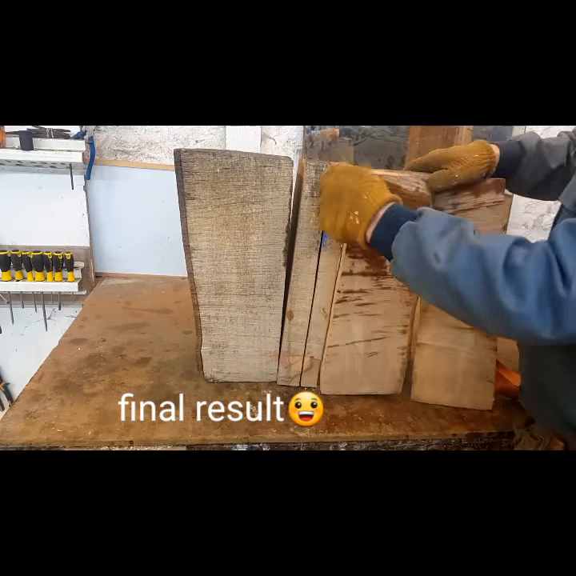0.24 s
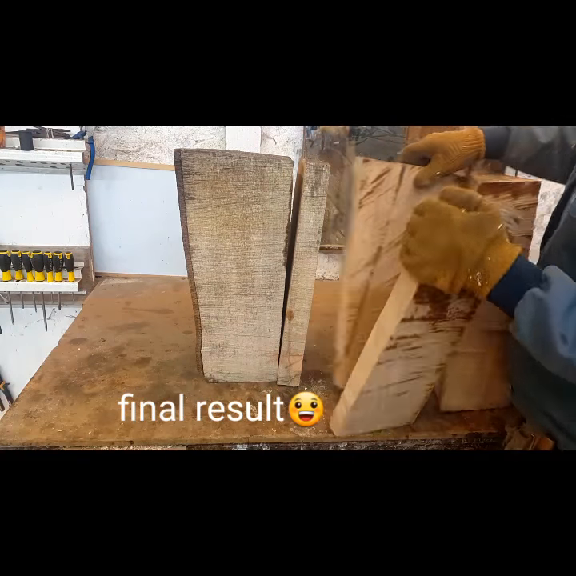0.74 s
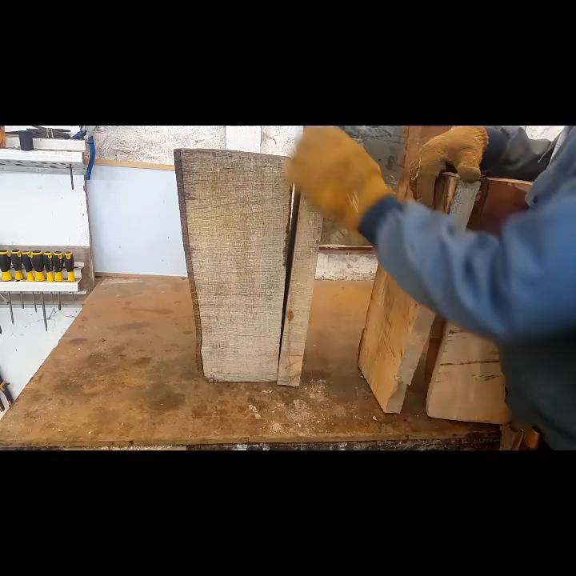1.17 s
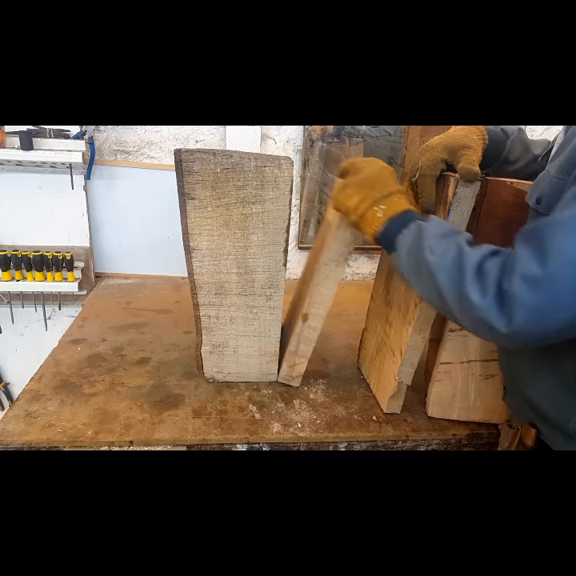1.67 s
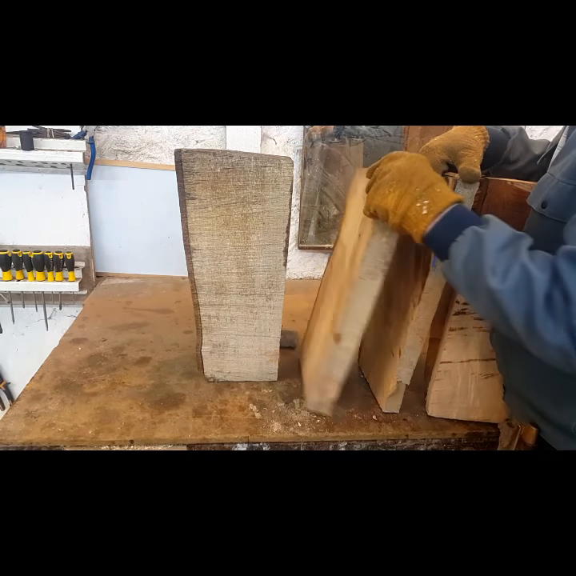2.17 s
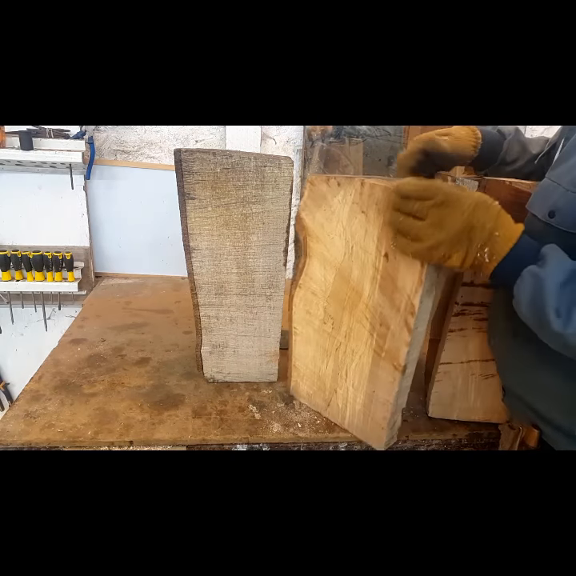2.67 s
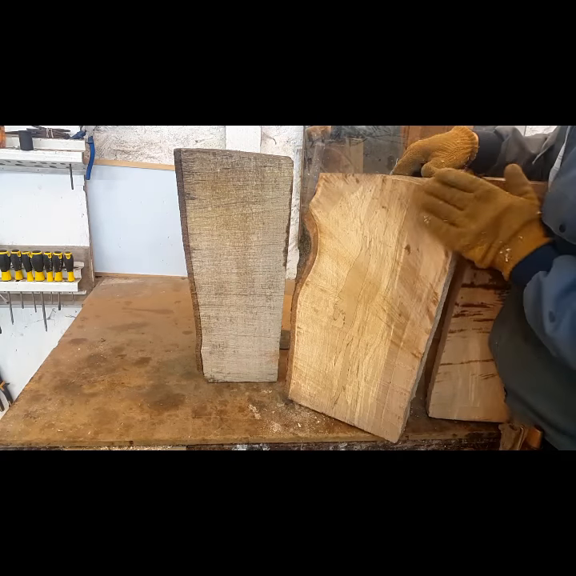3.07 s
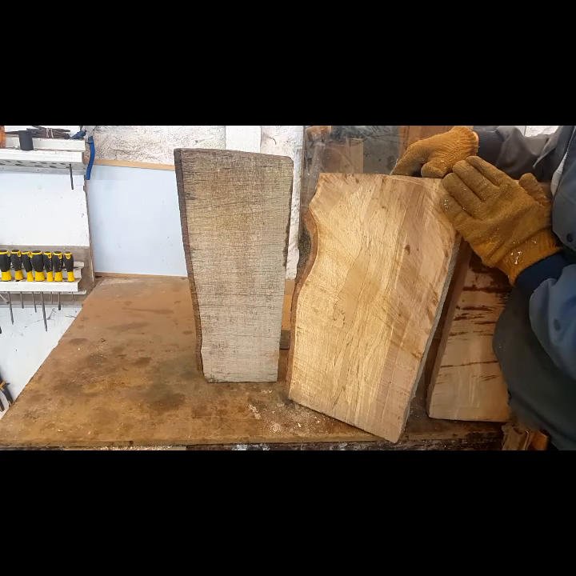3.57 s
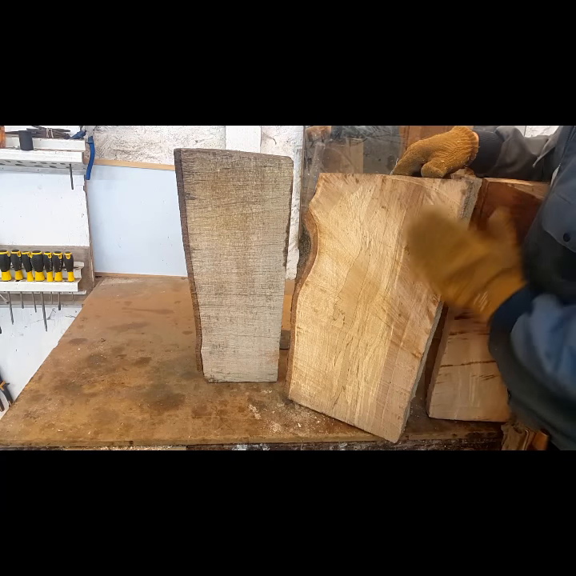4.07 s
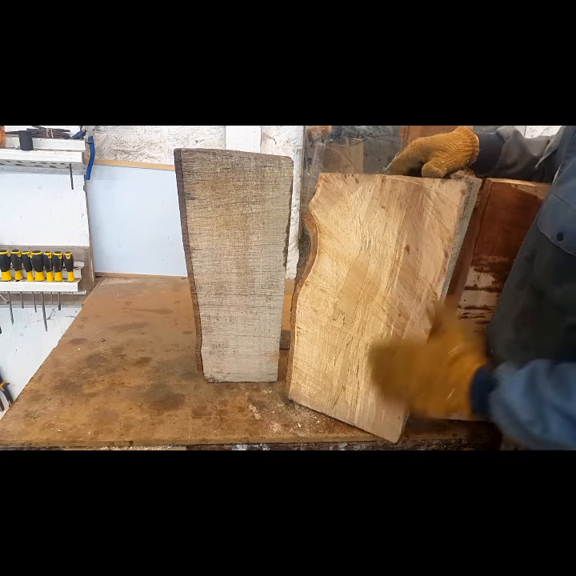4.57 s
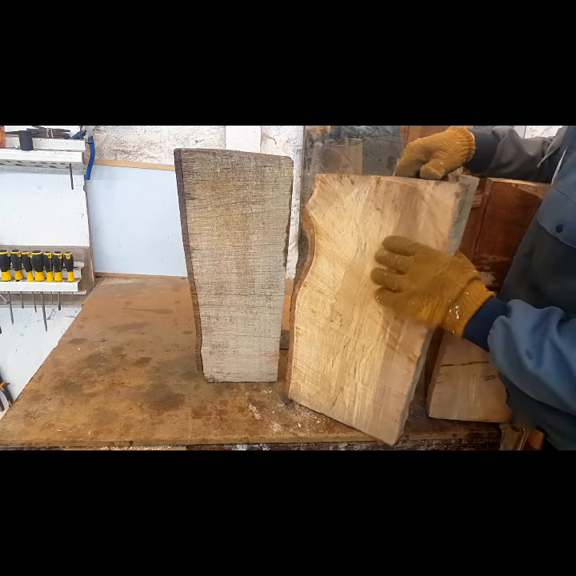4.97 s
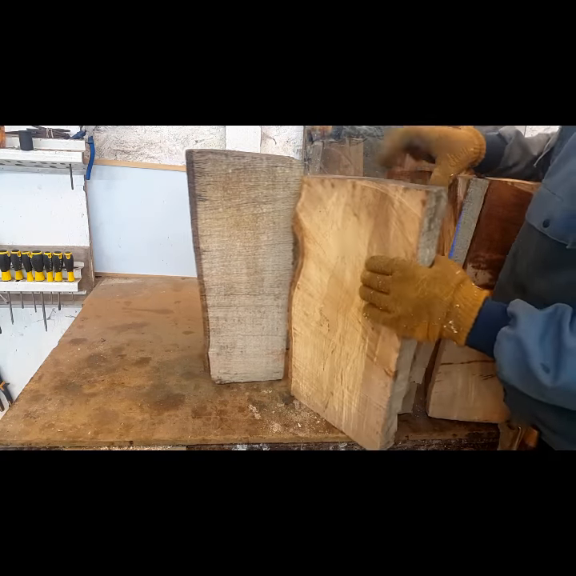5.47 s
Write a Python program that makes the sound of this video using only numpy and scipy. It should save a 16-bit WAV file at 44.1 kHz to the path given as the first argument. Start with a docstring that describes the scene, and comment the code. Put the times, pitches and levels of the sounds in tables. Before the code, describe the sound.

Wooden boards knock and scrape against each other and a workbench, with gloves rubbing over the rough wood.

```python
"""A small workshop, where gloved hands turn over sawn boards an arm's length from two microphones.
Boards knock on each other and on the bench, ringing in their damped bending modes; hard edges tick.
Stick-slip friction makes gloves hiss on the rough faces and dragged edges scrape, grumble and squeak.
The room reverberates briefly over microphone hiss and a faint hum; the level dips three times early on."""
import sys
import numpy as np
from scipy import signal
from scipy.fft import rfft, irfft
from scipy.io import wavfile
from scipy.ndimage import uniform_filter1d, map_coordinates

SR = 44100
rng = np.random.default_rng(int(sys.argv[2]) if len(sys.argv) > 2 else 0)


def dump(signal):
    """Clip the signal to [-1, 1] and save it as 16-bit WAV at the path in sys.argv[1]."""
    limited = np.clip(np.atleast_2d(signal).T, -1, 1)
    pcm = np.round(limited * 32767).astype(np.int16)
    wavfile.write(sys.argv[1], SR, pcm)


N = 252252

# Blows on the boards. Each row: start in seconds, level in dB, main mode in Hz, nominal cycles to fade
# 60 dB, rattle in dB, boost of the upper modes in dB, bass cutoff as a share of the main mode.
KNOCKS = [(0.004, -39.5, 212, 10.5, -12, 7, 0.81), (0.086, -46.5, 221, 15, -4, -3, 0.21),
          (0.128, -32.5, 335, 10, -18, -3, .4), (0.158, -48.5, 204, 17, 2, -8, 0.26),
          (0.182, -42, 237, 18, -19, -9, 0.37), (0.232, -56.5, 172, 15, 6, 7, 0.38),
          (0.456, -51, 432, 15, 13, -11, 0.38), (0.535, -43, 416, 15, -3, 6, .28),
          (0.555, -50.5, 156, 15, -8, -8, 0.24), (0.611, -41, 478, 24, 2, -4, .3),
          (0.64, -23, 476, 31, -5.5, -23, 0.15), (0.654, -28, 475, 15, -3, -6, 0.2),
          (0.708, -43, 300, 12, -19, -7, .35), (0.764, -31.5, 486, 23, -10, -3, .1),
          (0.801, -43.5, 366, 12, -6, -5, 0.32), (0.847, -33, 269, 11, -6.5, 2.5, 0.29),
          (0.91, -44, 198, 3, -1.5, -2, 0.24), (0.999, -14, 292, 7, -7.5, 3, 0.6),
          (1.045, -55, 296, 13, -14, -13, .4), (1.216, -26.5, 421, 30, 1.5, 4.5, 0.082),
          (1.448, -50, 665, 18, -3, 8, 0.35), (1.51, -53, 142, 19, -5, 2, 0.38),
          (1.699, -37.5, 890, 47, -17, 8, 0.62), (1.76, -24, 518, 21, -11.5, 10, 0.56),
          (1.81, -21.5, 398, 31.5, -10, 4, 0.75), (1.847, -7, 1246, 25.5, 2.5, 7, 0.87),
          (1.855, -18.5, 682, 22, 7.5, 18, 0.54), (1.863, -25.5, 858, 7, 9.5, -1.5, 0.35),
          (1.889, -25.5, 896, 27, 0.5, -1, .32), (1.983, -22, 243, 15.5, 0, 4.5, 0.37),
          (1.994, -21.5, 304, 10.5, -10, 9.5, 0.65), (2.285, -23.5, 480, 19, -19, -8, 0.39),
          (2.298, -18.5, 1030, 16, 1, -9, 0.61), (2.36, -21, 923, 38, -2, 13, 0.22),
          (2.43, -32.5, 700, 27, 4, 4, .3), (2.86, -47.5, 492, 21, 8, -7, 0.39),
          (3.003, -48, 460, 27, 6, -3, 0.86), (3.038, -18.5, 294, 29.5, -12, 4.5, 0.41),
          (3.047, -23, 700, 26, -14, -1, 0.57), (3.054, -24, 336, 16, -11, 2, 0.32),
          (3.129, -36, 328, 42, -24, 4, 0.42), (3.176, -42, 294, 24, -17.5, -1, 0.39),
          (5.128, -38.5, 460, 45, -3, -3.5, 0.25), (5.421, -35, 325, 30, -22, 2.5, 0.45),
          (5.445, -34.5, 188.5, 15, -4.5, 3, 0.55), (5.461, -32.5, 336, 19, -17, 5, 0.41),
          (5.496, -41.5, 238, 25, -11, -2, 0.23), (5.515, -45.5, 239, 32, -12, -5, 0.3)]
# Modes of a board. Each row: ratio to the main mode, level in dB, share of the nominal ring time.
BOARD_MODES = [(.6, -11, 0.8), (0.858, -7, 1.02), (1.002, -1.5, 1.09), (1.198, -9, .9), (1.5, -12, 0.86),
               (2.1, -2, 0.39), (2.799, -14, 0.39), (3.899, -12.5, .5), (5.3, -15.5, .4)]
# Hard edges and grit ticking. Each row: start in seconds, peak in dB.
TICKS = [(0.046, -45), (0.099, -52), (0.232, -49), (0.5345, -42), (0.6452, -29), (0.849, -40),
         (1.0006, -28.5), (1.2198, -35), (1.492, -40.5), (1.6493, -37.5), (1.7611, -35), (1.8128, -29),
         (1.8474, -29), (1.8539, -36), (1.892, -47), (1.9844, -14.5), (2.126, -27), (2.1283, -16.5),
         (2.1415, -35), (2.301, -18), (2.8883, -53), (3.041, -33), (5.016, -38.5), (5.4497, -37)]
# Strokes of a glove or board edge. Each row: time of the peak, rise and fall in seconds,
# then the levels of fibre hiss, board grumble and scrape in dB.
STROKES = [(0.1, 0.034, 0.0062, -51.5, -74, -62), (0.176, 0.074, 0.096, -67, -62, -67),
           (0.263, 0.039, 0.034, -60, -64, -63), (0.41, 0.072, 0.085, -64, -65, -64),
           (0.52, 0.25, 0.062, -59, -66.5, -65.5), (0.625, 0.055, 0.091, -52.5, -50.5, -52),
           (0.79, 0.13, 0.038, -60, -83, -59), (0.915, 0.11, 0.02, -57.5, -70, -63),
           (1.02, 0.037, 0.046, -79, -79, -80), (1.12, 0.12, 0.067, -58, -99, -86),
           (1.232, 0.019, 0.01, -40.5, -42.5, -59), (1.37, 0.13, 0.8, -65, -88, -81),
           (1.48, 0.099, 0.28, -71.5, -68, -73), (1.684, 0.073, 0.21, -56.5, -61, -57.5),
           (1.859, .03, 0.32, -52, -53.5, -40.5), (2.009, .08, 0.13, -51, -41.5, -70),
           (2.251, .15, 0.082, -43, -45.5, -47.5), (2.309, 0.11, 0.17, -38.5, -41, -50.5),
           (2.42, 0.17, 0.12, -53.5, -43.5, -45), (2.508, 0.13, 0.11, -43, -44, -46.5),
           (2.63, 0.13, 0.12, -58, -54, -63.5), (2.867, 0.39, 0.21, -56, -60.5, -61),
           (3.061, 0.058, 0.23, -55.5, -44.5, -53), (3.349, 0.3, 0.14, -53.5, -67, -63),
           (4.27, .15, .2, -47.5, -64.5, -57.5), (4.451, 0.33, 0.22, -40, -58.5, -54),
           (4.72, .17, 0.18, -48.5, -59.5, -61.5), (5.05, 0.53, 0.22, -63, -69, -72),
           (5.179, .1, 0.21, -52, -51.5, -54), (5.46, 0.093, 0.17, -62, -53, -65),
           (5.661, 0.063, 0.086, -36, -56, -49.5), (5.715, 0.062, .1, -22, -41, -33)]
# Wood chirping as an edge slips. Each row: start in seconds, pitch in Hz, level in dB, rise in ms.
SQUEAKS = [(0.458, 1520, -48.5, 2.2), (1.65, 7100, -56.5, 18), (1.762, 4400, -44.5, 3),
           (1.813, 4500, -50, 3), (1.948, 6200, -43, 3.2), (5.14, 1820, -51.5, 10)]

# Noise spectra. Each row: frequency in Hz, level in dB before colour() scales it by its contrast.
RATTLE_SPECTRUM = [(80, -40), (200, -2), (500, 6.5), (1200, 5), (2500, -3.5), (4200, -11), (5600, 0),
                   (9000, -25), (15500, -61)]
TICK_SPECTRUM = [(400, -24), (1200, -5), (2500, -3), (4200, -4), (5600, 0), (8000, -6), (12000, -15),
                 (16000, -24)]
FIBRE_SPECTRUM = [(880, -32.5), (1500, -16.5), (1810, -19.5), (1960, -19), (2360, -14), (2660, -11.5),
                  (4430, -7), (5510, 4.5), (9280, -19.5), (12200, -25.5), (13800, -40), (15300, -36.5),
                  (15800, -51)]
GRUMBLE_SPECTRUM = [(24, -97), (40, -49), (150, -11), (206, -13), (287, -6), (446, -3.5), (496, -8),
                    (568, -6), (661, -6.5), (1500, -26.5), (1950, -48), (3300, -120)]
SCRAPE_SPECTRUM = [(400, -16), (800, 0.5), (1200, -0.5), (2000, -4), (3200, -9), (5000, -36.5)]
HISS_SPECTRUM = [(15, -38), (25, 8), (36, -20), (107, -7), (137, -11), (587, -5.5), (729, -11), (2090, -16),
                 (3880, -15), (4570, -16.5), (4950, -9.5), (7030, -9.5), (8050, -20.5), (12100, -20),
                 (15800, -25)]

# Reverberation. Each row: band centre in Hz, time to fade 60 dB in seconds, level in dB.
ROOM_BANDS = [(123, 0.9, -11.5), (293, 0.16, -9.5), (700, 0.19, -9.5), (1510, 0.24, -9), (3050, 0.12, -11),
              (6000, 0.12, -15), (12000, 0.19, -16.5)]
# Direction of the hands. Each row: time in seconds, lag of the left microphone in ms.
LEFT_LAG = [(.75, 0.043), (1.25, 0.21), (1.75, -0.06), (2.25, 0.043), (3.25, 0.091), (3.75, 0.15),
            (4.75, 0.13), (5.6, -0.075)]
# Unequal response of the two microphone ports. Each row: frequency in Hz, left minus right in dB.
PORT_BALANCE = [(60, -1), (110, -1), (200, -1), (380, -1), (700, -1.5), (1290, -0.5), (2380, 0),
                (4400, -4.5), (8120, 6), (15000, 6)]
# Dips of the whole level. Each row: start in seconds, end in seconds, gain in dB.
DIPS = [(0, .995, -3), (1.09, 1.215, -5), (1.275, 1.345, -15)]

CONTACT_MS, TICK_DECAY_MS = 0.86, 0.56
STACK_PAN_DB, KNOCK_SCATTER_DB, TICK_SCATTER_DB = 1.3, 2.5, 6.5  # left minus right: mean and spreads
STROKE_DROP_DB, STROKE_ROUNDNESS = 20, 1.32  # drop over one rise or fall; roundness 1 is a pointed top
FIBRE_WIDTH = .65  # side over mid: each microphone hears its own part of the glove
WALL_MS, WALL_DB, COHERENT_BELOW_HZ = 6.1, -19, 651
HISS_DB, HUM_DB, HUM_BAND_HZ = -65.5, -87, (89, 111)
CONTACT_DELAY_MS = 1.6  # knocks, ticks and squeaks sound this long after their listed times
LOW_CUT_HZ, TOP_CUT_HZ, DC_OFFSET, DIP_RAMP_S = 42.8, 15900, -.0004, .012
SIDES = np.array([[1], [-1]])  # opposite signs for left and right


def board_knocks():
    """Modal vibration: a half-sine contact force excites a board's damped modes, with a short rattle."""
    t = np.arange(SR // 3) / SR
    ratio, mode_db, ring_share = np.transpose(BOARD_MODES)[:, :, None]
    scatter = rng.standard_normal((len(KNOCKS), 2, len(BOARD_MODES), 1))
    noises = rng.standard_normal((len(KNOCKS), len(t)))
    pans_db = STACK_PAN_DB + KNOCK_SCATTER_DB * rng.standard_normal(len(KNOCKS))
    force = np.sin(np.pi * np.clip(t[:400] * 1000 / CONTACT_MS, 0, 1))
    out = np.zeros((2, N + len(t)))
    for knock, (detune, spot), noise, pan_db in zip(KNOCKS, scatter, noises, pans_db):
        start, db, hz, cycles, rattle_db, upper_db, cutoff_share = knock
        log_decay = -np.log(1000) * t * hz / cycles
        # the spot that is hit sets how strongly each mode answers
        strength = undb(mode_db + upper_db * (ratio > 4 / 3) + 0.49 * spot)
        mode_hz = hz * ratio * (1 + 0.016 * detune)
        modes = strength * np.exp(log_decay / ring_share) * np.sin(2 * np.pi * mode_hz * t)
        ring = np.convolve(modes.sum(axis=0), force)[:len(t)]
        ring *= 1 - np.exp(-t * hz / .6)  # builds as the board rocks into full contact
        rattle = undb(rattle_db) * colour(noise * np.exp(log_decay / 0.84), RATTLE_SPECTRUM)
        # a free board radiates little below its lowest mode, one resting on the bench more
        blow = butterworth(ring / np.abs(ring).max() + rattle, 3, cutoff_share * hz, "highpass")
        out[:, int(start * SR):][:, :len(t)] += undb(db + SIDES * pan_db / 2) * blow
    return out[:, :N]


def edge_ticks():
    """A brief contact has a broad spectrum: each tick is an impulse and a fast-dying burst of noise."""
    t = np.arange(SR // 50) / SR
    noises = rng.standard_normal((len(TICKS), len(t)))
    pans_db = TICK_SCATTER_DB * rng.standard_normal(len(TICKS))
    out = np.zeros((2, N + len(t)))
    for (start, db), noise, pan_db in zip(TICKS, noises, pans_db):
        burst = (noise + 5 * (t == 0)) * np.exp(-t * 1000 / TICK_DECAY_MS)
        tick = colour(burst, TICK_SPECTRUM)
        tick /= np.abs(tick).max()
        out[:, int(start * SR):][:, :len(t)] += undb(db + SIDES * pan_db / 2) * tick
    return out[:, :N]


def rubbing():
    """Sliding friction: gloves hiss on the saw marks; dragged edges slip unevenly and shake the board."""
    hiss_gain, grumble_gain, scrape_gain = stroke_envelopes()
    slip = wander(49)
    mid, side = (friction_noise(12000, 1.8, FIBRE_SPECTRUM) for _ in range(2))
    hiss = (mid + FIBRE_WIDTH * side * SIDES) * hiss_gain * undb(.7 * wander(70) + .4 * slip)
    grumble = friction_noise(2500, 1.5, GRUMBLE_SPECTRUM) * grumble_gain * undb(1.5 * slip)
    scrape = friction_noise(5000, 2.2, SCRAPE_SPECTRUM) * scrape_gain * undb(1.2 * slip)
    return hiss + grumble + scrape


def stroke_envelopes():
    """Incoherent sources add in power: overlapping strokes give the gains of hiss, grumble and scrape."""
    t = np.arange(0, N + 32, 32) / SR
    power = 0
    for peak_s, rise_s, fall_s, *levels_db in STROKES:
        from_peak = np.where(t < peak_s, (peak_s - t) / rise_s, (t - peak_s) / fall_s)
        drop_db = STROKE_DROP_DB * from_peak ** STROKE_ROUNDNESS
        power += undb(np.array(levels_db)[:, None] - drop_db) ** 2
    return [np.interp(np.arange(N) / SR, t, np.sqrt(layer)) for layer in power]


def friction_noise(per_second, spread_db, spectrum):
    """Shot noise: fibres catch and let go in dense, random clicks of uneven size."""
    caught = rng.random(N) < per_second / SR
    clicks = caught * rng.standard_normal(N)
    sizes = undb(spread_db * np.minimum(rng.exponential(size=N), 4))
    return unit_rms(colour(clicks * sizes, spectrum))


def squeaks():
    """Stick-slip oscillation: short notes whose pitch and strength waver as an edge slips."""
    t = np.arange(N) / SR
    waver = 1 + .025 * wander(300)
    flutter = undb(4 * wander(250))
    out = np.zeros(N)
    for start, hz, db, rise_ms in SQUEAKS:
        age = np.clip(t - start, 0, None) * 1000 / rise_ms
        phase = 2 * np.pi * np.cumsum(hz * waver) / SR
        out += undb(db) * age * np.exp(1 - age) * np.sin(phase)
    return out * flutter


def reverberation(x):
    """Reflections depend on position: the hands move, so each tenth of a second has a new response."""
    hop = SR // 10
    window = np.sin(np.pi * np.arange(2 * hop) / (2 * hop))
    x = np.pad(x, (hop, 2 * hop))
    wet = np.zeros((2, N + SR))
    for at in range(0, N + hop, hop):
        part = signal.fftconvolve((x[at:at + 2 * hop] * window)[None], room_response(), axes=1)
        wet[:, at:at + part.shape[1]] += part
    return wet[:, hop:hop + N]


def room_response():
    """One wall echo and a diffuse field that decays by band; long waves reach both microphones alike."""
    t = np.arange(SR // 3) / SR
    out = np.zeros((2, len(t)))
    for hz, t60, db in ROOM_BANDS:
        mid, side = butterworth(rng.standard_normal((2, len(t))), 2, [hz / 1.5, hz * 1.5], "bandpass")
        width = min((hz / COHERENT_BELOW_HZ) ** 1.5, 1.3)
        envelope = (1 - np.exp(-(t / .005) ** 2)) * np.exp(-np.log(1000) * t / t60)
        out += undb(db) * (mid + width * side * SIDES) * envelope / np.linalg.norm(envelope)
    out[:, int(WALL_MS * SR / 1000)] += undb(WALL_DB)
    return out


def hiss_and_hum():
    """Self-noise is independent in each microphone; a wavering narrow-band hum is common to both."""
    hiss = np.array([unit_rms(colour(rng.standard_normal(N), HISS_SPECTRUM)) for _ in range(2)])
    hum = butterworth(rng.standard_normal(N), 2, HUM_BAND_HZ, "bandpass")
    return undb(HISS_DB + .5 * wander(5)) * hiss + undb(HUM_DB) * unit_rms(hum)


def colour(x, spectrum, contrast=0.79):
    """Minimum-phase filter whose gain in dB is the spectrum's level times the contrast."""
    hz, db = np.transpose(spectrum)
    log_hz = np.log(np.fft.rfftfreq(4096, 1 / SR) + 1)
    log_gain = contrast * np.interp(log_hz, np.log(hz), db) * np.log(10) / 20
    cepstrum = irfft(log_gain)
    cepstrum[1:2048] *= 2  # folding onto positive time makes the filter causal
    cepstrum[2049:] = 0
    return signal.fftconvolve(x, irfft(np.exp(rfft(cepstrum))))[:len(x)]


def wander(per_second):
    """Slow random modulation: held levels, smoothed twice, with a standard deviation of one."""
    hold = int(SR / per_second)
    steps = np.repeat(rng.standard_normal(N // 20), hold)[:N]
    smooth = uniform_filter1d(uniform_filter1d(steps, hold), hold)
    return smooth / smooth.std()


def butterworth(x, order, hz, kind):
    """Filter with a maximally flat passband."""
    return signal.sosfilt(signal.butter(order, hz, kind, fs=SR, output="sos"), x)


def undb(db):
    """Amplitude ratio of a level in dB."""
    return 10 ** (np.asarray(db) / 20)


def unit_rms(x):
    """Normalisation to a mean power of one."""
    return x / np.sqrt(np.mean(x ** 2))


def scene():
    """Superposition at two spaced microphones: direct sound, reverberation and background noise."""
    delay = int(CONTACT_DELAY_MS * SR / 1000)
    contacts = np.roll(board_knocks() + edge_ticks() + squeaks(), delay, axis=1)
    left, right = butterworth(contacts + rubbing(), 2, LOW_CUT_HZ, "highpass")
    wet = reverberation((left + right) / 2)
    # the path difference between the microphones changes as the hands move
    lag = np.interp(np.arange(N) / SR, *np.transpose(LEFT_LAG)) * SR / 1000
    left = map_coordinates(left, [np.arange(N) - lag], order=3, mode="nearest")
    left, right = np.array([left, right]) + wet
    ports = [colour(left, PORT_BALANCE, contrast=.5), colour(right, PORT_BALANCE, contrast=-.5)]
    return np.array(ports) + hiss_and_hum()


def record(dry):
    """Gain and band limiting: the converter's standing offset, brief level dips, then a steep top cut."""
    t = np.arange(N) / SR
    dip_db = np.zeros(N)
    for start, end, db in DIPS:
        dip_db += db * np.clip(np.minimum(t - start, end - t) / DIP_RAMP_S + .5, 0, 1)
    top_cut = signal.ellip(10, .2, 70, TOP_CUT_HZ, fs=SR, output="sos")
    return signal.sosfilt(top_cut, (dry + DC_OFFSET) * undb(dip_db))


dry = scene()
out = record(dry)
dump(out)
```